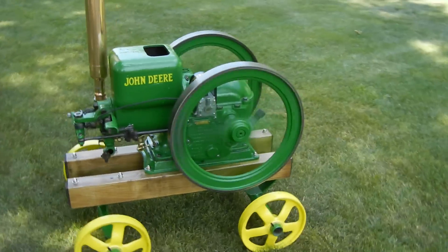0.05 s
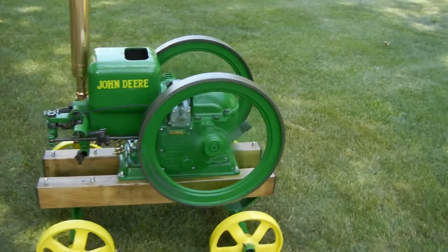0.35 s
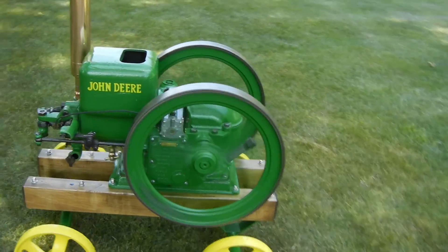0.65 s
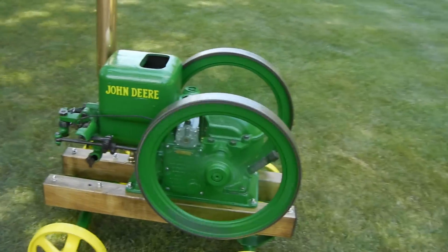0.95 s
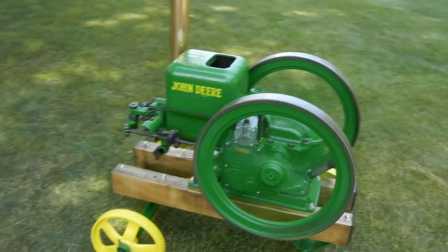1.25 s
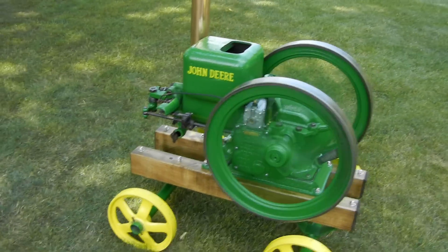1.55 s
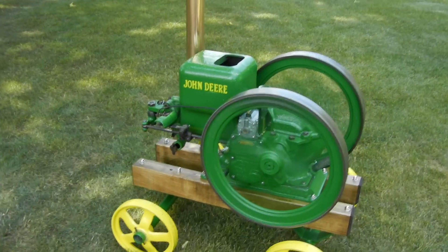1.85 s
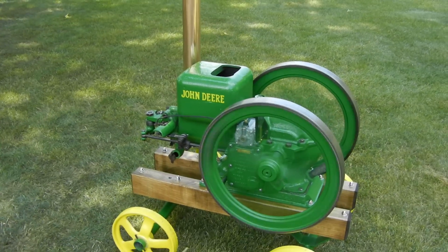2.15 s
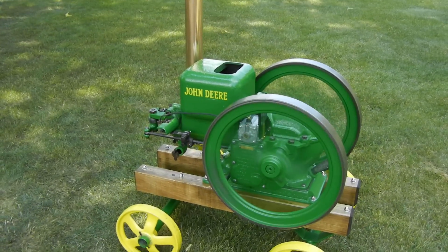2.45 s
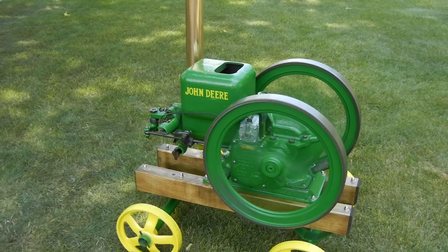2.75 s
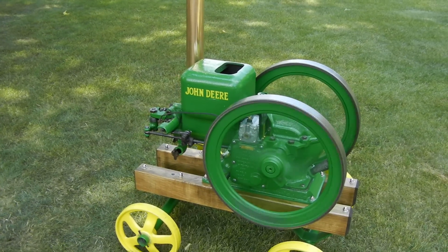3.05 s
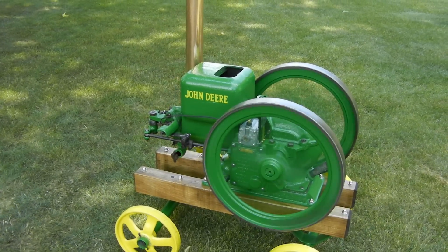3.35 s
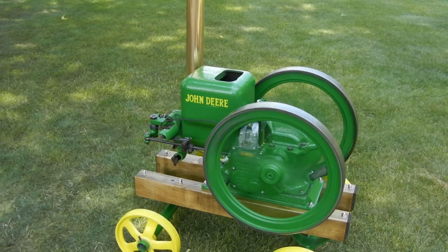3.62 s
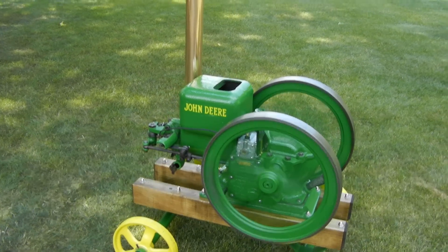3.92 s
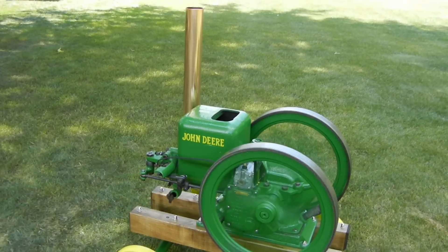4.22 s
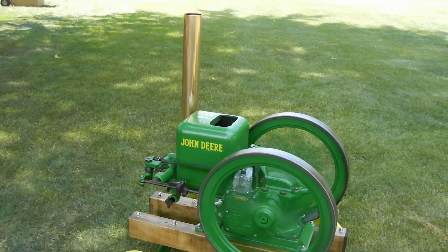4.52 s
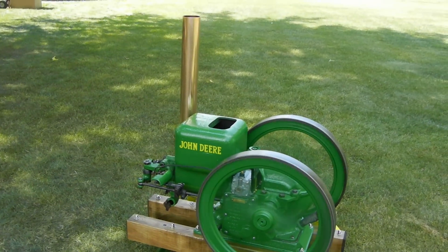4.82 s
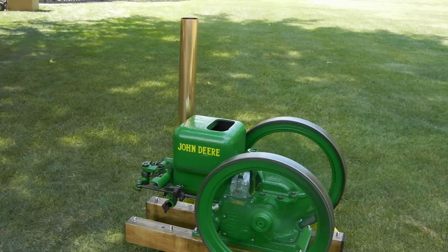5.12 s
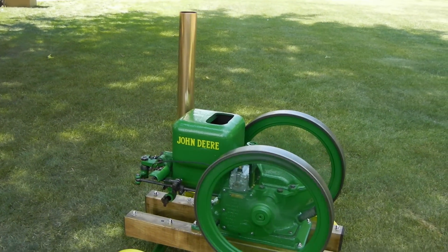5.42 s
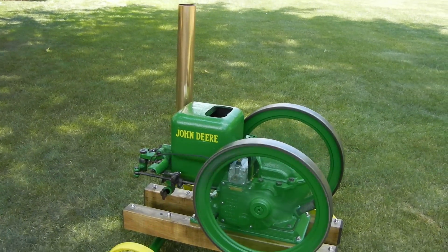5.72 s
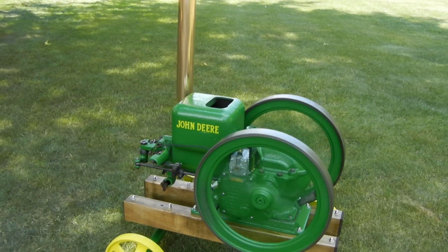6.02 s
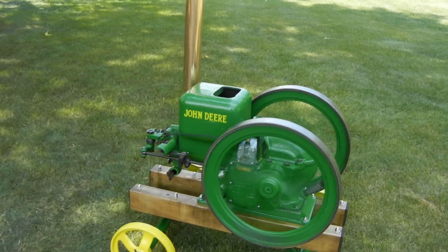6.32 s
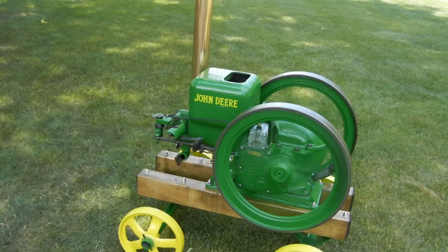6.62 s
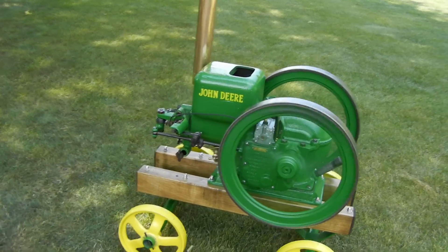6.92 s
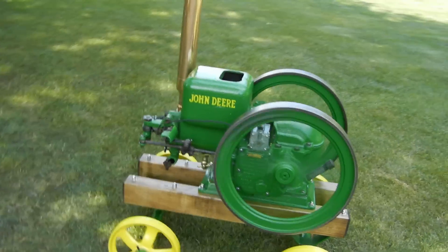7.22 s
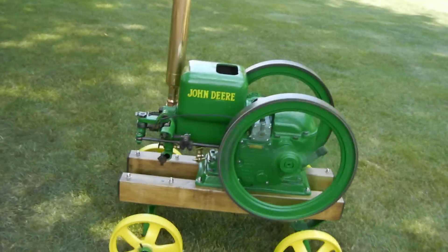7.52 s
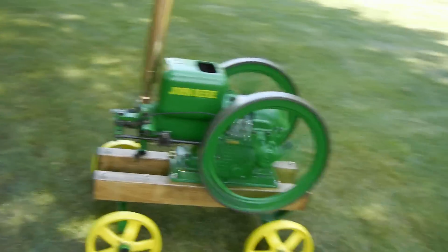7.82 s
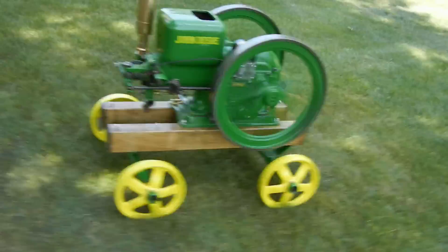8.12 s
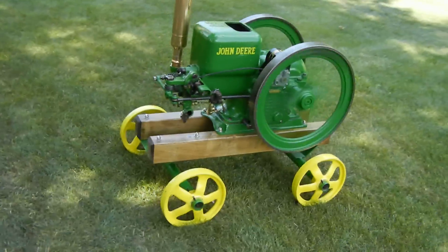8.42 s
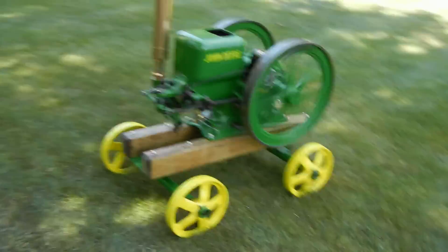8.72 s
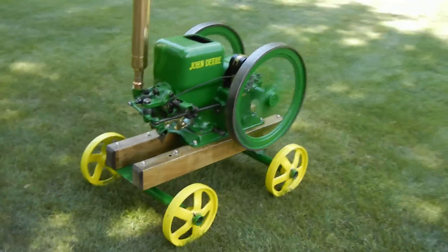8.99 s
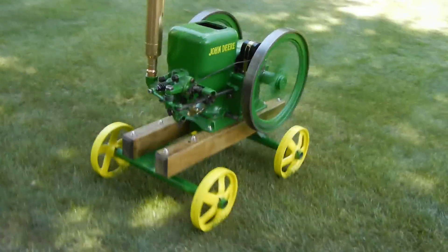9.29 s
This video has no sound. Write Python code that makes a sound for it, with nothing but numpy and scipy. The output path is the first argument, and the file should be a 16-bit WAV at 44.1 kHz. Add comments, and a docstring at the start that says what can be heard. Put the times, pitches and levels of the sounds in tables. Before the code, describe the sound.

An old single-cylinder stationary engine idles outdoors on a lawn, heard close up for about ten seconds. It fires five times, at about 0.3, 2.4, 4.5, 6.8 and 8.6 seconds. Just before each firing comes a short, raspy suck of air with a chattering, faintly honking valve, then a hard steel snap. The sharp exhaust bang follows at once, with a hollow note from the stack and a brief hissing tail. The bangs are the loudest sounds, and each makes the overall level dip for a moment.

Between firings the engine coasts on its flywheels, slowing slightly. A latch clacks with a short metallic ring about five times a second, each clack followed by a lighter clink. Underneath, from start to end, gears rattle and whirr in quick surges, the connecting rod knocks, sometimes harder, and the piston adds soft low thuds.

```python
"""Five sharp bangs, with clacking and rattling between them: a hit-and-miss engine idles close by on a lawn.
For each firing it sucks in a charge, snaps its igniter and fires up the exhaust stack. Then it coasts on
its flywheels, slowing a little, and the governor latch clacks once per coasting turn of the cam (two
revolutions, four strokes). Underneath, the connecting rod knocks, the gears rattle and the piston thuds.
Each bang ducks the camera's gain for a moment."""
import sys
import numpy as np
from scipy import signal
from scipy.fft import rfft, irfft, next_fast_len
from scipy.io import wavfile
from scipy.ndimage import uniform_filter1d, map_coordinates

SR = 44100
rng = np.random.default_rng(int(sys.argv[2]) if len(sys.argv) > 2 else 0)


def transcribe(u):
    """Save the signal u as a 16-bit wav file named by the first command-line argument.

    u: samples, shape (n,) or (channels, n), limited to [-1, 1]; the rate is SR.
    q: integer samples, one column per channel.
    """
    v = np.clip(np.atleast_2d(u).T, -1, 1)
    q = np.round(v * 32767).astype(np.int16)
    wavfile.write(sys.argv[1], SR, q)


N = 421155

# the firings: (time of the bang [s], bang trim [dB], intake trim [dB], igniter trim [dB])
FIRINGS = [(0.3214, 4.5, 6, -0.5), (2.4201, 5.5, 2, -0.5), (4.5287, 5.5, 2.5, -4), (6.8484, 4.5, 5, 1),
           (8.5521, 4.5, 0, 0)]
# tone of the moving iron, a low-mid rattle and a brighter whirr: (frequency [Hz], relative level [dB])
RATTLE_EQ = [(100, -34.5), (330, -4.5), (420, -17.5), (520, -2.5), (1050, -2), (1350, 2.5), (2000, -5),
             (3000, -15.5), (4500, -26), (8000, -33), (10000, -38), (16000, -44)]
WHIRR_EQ = [(200, -35.5), (600, -9), (1200, -6), (2100, 5), (2800, 0), (3600, -7), (4600, -27.5),
            (8000, -35.5), (10000, -34.5), (16000, -31.5)]


def exhaust():
    """The valve opens: a pressure slug rings the stack, the jet roars and hisses, the piston hoots."""
    # gas column of the stack: (frequency [Hz], relative level [dB], t60 [s])
    stack_modes = [(199, -0.5, 0.075), (266.5, -7, 0.11)]
    # tone of the jet and of its hissing tail: (frequency [Hz], relative level [dB])
    jet_eq = [(50, -24), (250, -11), (450, 4.5), (1000, 2.5), (1900, 10), (3000, 6.5), (4500, -6.5),
              (8000, -11.5), (16000, -14)]
    hiss_eq = [(200, 10), (700, -17), (2000, -4), (4000, -6), (7500, -4), (11000, -11), (16000, -9.5)]
    s, db, *_ = np.transpose(FIRINGS)
    t, slug = np.arange(SR // 3) / SR, np.zeros(N)
    column = sum(amp(level - 60 * t / t60) * np.sin(2 * np.pi * hz * t) for hz, level, t60 in stack_modes)
    hoot = amp(-5) * np.exp(-((t - .057) / .012) ** 2) * np.sin(2 * np.pi * 165 * t)
    for start, level in zip(s, db):
        add(slug, start, hoot - amp(level + 4) * column)
    # the slug keeps little deep bass below about 110 Hz
    slug = signal.sosfilt(signal.butter(2, 110, "highpass", fs=SR, output="sos"), slug)
    jet = colour(bursts(s + .0026, db + 9.5, t60=.055, rise=.0019), jet_eq, iron=.16)
    hiss = colour(bursts(s + .005, db - 14, t60=.35, rise=.0051), hiss_eq, iron=.62)
    return pan_right(slug) + jet + hiss


def intake():
    """Before a firing the piston sucks air past the spring valve, which chatters on its seat and honks."""
    # tone of the inrushing air and of the valve on its seat: (frequency [Hz], relative level [dB])
    air_eq = [(100, 4), (400, -1.5), (650, 2), (1000, -6), (2400, 1), (3500, -10), (5500, -13),
              (12000, -17.5), (16000, -17)]
    valve_eq = [(300, 0), (2000, 12), (4500, 3), (7000, -4), (10000, -3.5), (12500, 4), (16000, -14)]
    s, _, db, _ = np.transpose(FIRINGS)
    t, honk = np.arange(SR // 3) / SR, np.zeros(N)
    flutter = np.sin(2 * np.pi * 158 * np.arange(N) / SR + 1.3 * wobble(45))
    # the fluttering valve chops the air into a rasp
    air = colour(bursts(s - .156, db - 10.5, t60=.27, rise=.028) * amp(1.2 * flutter), air_eq, iron=.96)
    # (time before the bang [s], level [dB])
    bounces = [(.1335, -7.5), (.115, -11.5), (.101, -26), (.092, -18), (.068, -31)]
    chatter = sum(bursts(s - lead, db + level, t60=.046, rise=.0003, same=.28) for lead, level in bounces)
    for start, level in zip(s - .147, db):
        add(honk, start, amp(level - 24 - 60 * t / .74) * (1 - np.exp(-t / .0027)))
    return air + colour(chatter, valve_eq, iron=.9) + pan_right(honk * flutter)


def igniter():
    """The igniter trips with a hard steel snap just before the charge burns."""
    # tone of the snap: (frequency [Hz], relative level [dB])
    snap_eq = [(200, -6), (800, -3.5), (2200, 3.5), (3300, 0), (4800, -7), (6500, -3.5), (9000, -8.5),
               (12000, -13), (16000, -15)]
    s, *_, db = np.transpose(FIRINGS)
    return colour(bursts(s - .0402, db - 1, t60=.035, same=.47), snap_eq, iron=.6)


def latch():
    """On coasting turns the push rod clacks onto the governor latch, rings, rebounds and clinks off."""
    # the clack's iron body and bright steel edge: (frequency [Hz], relative level [dB])
    iron_eq = [(60, -32), (400, -10.5), (700, -3.5), (1050, -2.5), (1400, 4.5), (1900, -7.5), (2800, -0.5),
               (3300, -11), (4500, -20.5), (7000, -31), (16000, -77)]
    steel_eq = [(300, -35), (2500, 4), (4000, 12), (5500, 0.5), (7500, -3), (10000, -1.5), (13000, -5.5),
                (16000, -10)]
    # ring of the push rod: (frequency [Hz], relative level [dB], t60 [s])
    rod_modes = [(1480, -5, .07), (2855, 0, .08)]
    s, length, fired, _ = cam_turns()
    catch, release = s[~fired], (s + .17 * length)[~fired]
    scatter = rng.standard_normal((len(catch), 6)).T
    clack_db, ring_db, clink_db, bounce_db = 1.77 * scatter[:4]
    bounced = catch + .006 * (1 + .2 * scatter[4])
    seated = catch + .001495 + .001 * scatter[5]  # the rod slides home, never at quite the same instant
    iron = (bursts(seated, clack_db - 6.5, t60=.06, rise=.0011, same=.4)
            + bursts(release, clink_db / 2 - 10.5, t60=.03, rise=.00036, same=.37))
    steel = (bursts(catch, ring_db - 19, t60=.026, rise=.00044, same=.66)
             + bursts(release, clink_db - 29, t60=.045, rise=.0004, same=.3))
    rebound = bursts(bounced, bounce_db - 9.5, t60=.048, rise=.0006, same=.45)
    rod = ringing(seated, clack_db - 15, rod_modes)
    return (colour(iron, iron_eq, iron=1.23) + colour(steel, steel_eq, iron=.89)
            + colour(rebound, WHIRR_EQ, iron=1.4) + rod)


def big_end():
    """The connecting rod takes up its play: a boom each stroke, a ringing double knock past mid-turn."""
    # accented turns: (time within the turn [s], force over a usual knock [dB])
    hard_knocks = [(.885, 6), (1.088, 7.5), (2.143, 9), (2.982, 8), (3.400, 1), (3.612, 6), (3.825, 7.5),
                   (4.884, 4), (5.504, 7), (7.847, 8)]
    # ring of the crankcase: (frequency [Hz], relative level [dB], t60 [s])
    case_modes = [(543.4, -3, .12), (1244, 0.5, 0.082), (1360, 1.5, 0.072)]
    # the frame's boom on each stroke: (position [share of the turn], level [dB])
    stroke_booms = [(.17, -26), (.385, -32), (.675, -25), (.87, -30)]
    s, length, _, charging = cam_turns()
    scatter = rng.standard_normal((len(s), 7)).T
    slips_s, accents_db = .002 * scatter[:4], 2.1 * scatter[4:6]
    force_db = 2 * scatter[6] - 11 * charging  # a compressed charge cushions the knock
    for when, db in hard_knocks:
        force_db[np.searchsorted(s, when) - 1] = db
    knock_db = force_db / 2 - 19.5
    heavy = sum(bursts(s + share * length + slip, knock_db, t60=.065, rise=.0037, same=1)
                for share, slip in zip((.605, .66), slips_s))
    light = sum(bursts(s + share * length + slip, db - 18, t60=.072, rise=.0051, same=.93)
                for share, slip, db in zip((.35, .86), slips_s[2:], accents_db))
    case = ringing(s + .62 * length + slips_s[0], knock_db, case_modes)
    knocking = (0, 0, 1, 0)  # the third stroke carries the knock
    booms = sum(frame_boom(s + share * length, db + knocks * force_db)
                for (share, db), knocks in zip(stroke_booms, knocking))
    return colour(heavy, RATTLE_EQ, iron=1.6) + colour(light, WHIRR_EQ, iron=1.3) + case + booms


def frame_boom(times, levels_db, hz=249.9, t60=.074):
    """The frame swells into a hollow boom after a blow."""
    t, track = np.arange(SR // 3) / SR, np.zeros(N)
    for s, db, (detune, accent) in zip(times, levels_db, rng.standard_normal((len(times), 2))):
        swell = amp(db + 1.8 * accent - 60 * t / t60) * t / .0047
        add(track, s, swell * np.sin(2 * np.pi * hz * (1 + .073 * detune) * t))
    return pan_right(track)


def running_gear():
    """Gears and bearings rattle in surges as the piston loads them; compression takes up their play."""
    # tone of the low thump: (frequency [Hz], relative level [dB])
    thump_eq = [(20, -22), (40, -14), (70, -9), (110, -1.5), (150, -6.5), (200, -3), (235, 1), (275, -3),
                (315, -11), (350, -4), (390, -18), (800, -17), (16000, -91)]
    # surges: (mean [dB], swing per revolution [dB], swing per stroke [dB], crest [share of the turn])
    rattle_surge = (-22.5, 2, 3, .158)
    whirr_surge = (-23.5, -0.44, 4.5, .134)
    thump_surge = (-32, 2, 2, .195)
    t, marks = np.arange(N) / SR, cam_marks()
    turn = np.interp(t, marks, np.arange(len(marks)))
    compression = sum(np.exp(-((t - bang + .056) / .025) ** 2) for bang, *_ in FIRINGS)
    play_db = 1.5 * wobble(35)
    rattle_db = surge(turn, *rattle_surge) + play_db - 9.4 * compression
    rattle = amp(rattle_db) * colour(wear(turn, same=.25, grit_db=1.5), RATTLE_EQ, iron=1.74)
    whirr_db = surge(turn, *whirr_surge) + play_db + 1.9 * wobble(60) - 6.9 * compression
    whirr = amp(whirr_db) * colour(wear(turn, same=.072, grit_db=2), WHIRR_EQ, iron=.98)
    thump_db = surge(turn, *thump_surge) + 1.8 * wobble(25) - 19 * compression
    thump = amp(thump_db) * colour(wear(turn, same=.48, grit_db=3.5), thump_eq)
    return rattle + whirr + thump


def surge(turn, mean_db, revolution_db, stroke_db, crest):
    """Level in dB that rises and falls once per revolution and once per piston stroke."""
    crank = 4 * np.pi * (turn - crest)
    return mean_db + revolution_db * np.cos(crank) + stroke_db * np.cos(2 * crank)


def wear(turn, same, grit_db, size=9216):
    """Worn surfaces chatter in small jolts: part comes round again with each cam turn, part is new."""
    samples_into_turn = np.round(np.arange(N) - SR * cam_marks()[turn.astype(int)]).astype(int)
    repeating = rng.standard_normal((2, size))[:, samples_into_turn % size]
    noise = np.sqrt(same) * repeating + np.sqrt(1 - same) * rng.standard_normal((2, N))
    return unit(noise * amp(grit_db * wobble(700)))


def piston_thuds(hz=89, width_s=.0039, top_db=-26, bottom_db=-33.5):
    """At top and bottom dead centre the piston turns round and shoves the wooden skids: a soft thud."""
    s, length, *_ = cam_turns()
    lead = SR // 40
    t, track = np.arange(-lead, lead) / SR, np.zeros(N)
    thud = np.exp(-(t / width_s) ** 2) * np.sin(2 * np.pi * hz * t)
    for share, db in ((0, bottom_db), (.26, top_db), (.5, bottom_db), (.76, top_db)):
        for centre, accent_db in zip(s + share * length, 2.1 * rng.standard_normal(len(s))):
            add(track, centre - lead / SR, amp(db + accent_db) * thud)
    return pan_right(track)


def cam_marks():
    """Start of every cam turn: a firing speeds the flywheels up, then friction lengthens each turn."""
    fastest, slowest, slowing = .2016, .217, .0017  # nominal turn lengths and growth per turn [s]
    bangs = np.array(FIRINGS)[:, 0]
    starts = bangs + .0177  # the exhaust valve opens just ahead of a turn
    last_clacks = bangs - .1995  # leaves time for intake, compression and burning
    coast = lambda k: k * fastest + slowing * k * (k - 1) / 2
    marks = [[last_clacks[0] - slowest, last_clacks[0]]]
    for start, end in zip(starts, last_clacks[1:]):  # each coast is stretched to hold whole turns
        turns = round((end - start) / ((fastest + slowest) / 2))
        marks.append(start + (end - start) * coast(np.arange(turns + 1)) / coast(turns))
    marks.append(starts[-1] + coast(np.arange(7)))
    return np.concatenate(marks)


def cam_turns():
    """Start and length of each turn, whether it opens with a bang, and whether it draws in a charge."""
    marks, bangs = cam_marks(), np.array(FIRINGS)[:, 0]
    fired = np.isin(np.arange(len(marks)), np.searchsorted(marks, bangs))
    return marks[1:-1], np.diff(marks)[1:], fired[1:-1], fired[2:]


def bursts(times, levels_db, t60, rise=.0001, same=0.):
    """Decaying noise hits, mid and side; the share `same` of their power repeats from hit to hit."""
    t = np.arange(SR // 3) / SR
    envelope = amp(-60 * t / t60) * (1 - np.exp(-t / rise))
    repeating, track = rng.standard_normal((2, len(t))), np.zeros((2, N))
    for s, db in zip(times, levels_db):
        noise = np.sqrt(same) * repeating + np.sqrt(1 - same) * rng.standard_normal(repeating.shape)
        add(track, s, amp(db) * envelope * noise)
    return track


def ringing(times, levels_db, modes):
    """Modes of a struck part; every blow excites them a little differently."""
    t, track = np.arange(SR // 3) / SR, np.zeros(N)
    hz, mode_db, t60 = np.transpose(modes)[:, :, None]
    scatter = rng.standard_normal((len(times), 2, len(modes), 1))
    for s, db, (accent, detune) in zip(times, levels_db, scatter):
        decay = amp(db + mode_db + 1.6 * accent - 60 * t / t60)
        partials = decay * np.sin(2 * np.pi * (hz + 9 * detune) * t)
        add(track, s, partials.sum(axis=0) * (1 - np.exp(-t / .002)))
    return pan_right(track)


def colour(x, eq, iron=0., thicket_db=7.5, spacing_hz=60, size=8192):
    """Unit-power EQ with cast-iron resonances scaled by `iron`; mid and side in, left and right out."""
    # cast-iron resonances: (frequency [Hz], width [Hz], lift at iron=1 [dB])
    iron_modes = [(553, 40, 5), (718, 100, 4), (804, 49, 1), (933, 20, 4.5), (1250, 41, 4), (1366, 24, 2.5),
                  (2284, 110, 1), (2826.6, 55, 3.5), (6200, 110, 1.5), (7900, 270, 2)]
    # stereo width: (frequency [Hz], left-right likeness [0-1])
    likeness = [(30, .45), (70, 0.74), (140, 0.97), (3000, 0.99), (6000, 0.55)]
    # stereo balance: (frequency [Hz], left minus right [dB])
    balance = [(50, -1.5), (150, -1), (3200, -2.07), (8000, 1), (12000, 3)]
    hz = np.fft.rfftfreq(size, 1 / SR)
    peaks = sum(lift / (1 + (2 * (hz - f) / width) ** 2) for f, width, lift in iron_modes)
    # toward the treble the small parts add a thicket of narrow modes
    ripple = np.tanh(map_coordinates(rng.standard_normal(size), [hz / spacing_hz]))
    thicket = ripple * thicket_db * hz / (hz + 2500)
    magnitude = unit(amp(along(eq, hz) + iron * (peaks + thicket)))
    cepstrum = irfft(np.log(magnitude + 1e-6))
    cepstrum[1:size // 2] *= 2  # minimum phase keeps the attacks sharp
    cepstrum[size // 2 + 1:] = 0
    spread = np.arccos(np.clip(along(likeness, hz), 0, 1)) / 2
    lean = amp(along(balance, hz) / 2)
    response = np.exp(rfft(cepstrum)) * np.array([lean, 1 / lean])
    mid = signal.oaconvolve(x[:1], irfft(response * np.cos(spread))[:, :size // 2], axes=1)
    side = signal.oaconvolve(x[1:], irfft(response * np.sin(spread))[:, :size // 2], axes=1)
    return (mid + side * [[1], [-1]])[:, :N]


def pan_right(mono):
    """Sets a sound a little to the right."""
    return mono * amp([[-.7], [.7]])


def amp(db):
    return 10 ** (np.asarray(db) / 20)


def unit(x):
    return x / np.sqrt(np.mean(x ** 2) + 1e-20)


def along(points, hz):
    """Joins (frequency [Hz], value) points on a log axis."""
    f, v = np.transpose(points)
    return np.interp(np.log(hz + 1), np.log(f + 1), v)


def wobble(rate):
    """A smooth random curve, rate knots a second."""
    return map_coordinates(rng.standard_normal(int(N * rate / SR) + 4), [np.arange(N) * rate / SR])


def add(track, s, sound):
    """Lays a sound into a track at time s."""
    start = max(round(s * SR), 0)
    part = sound[..., :max(N - start, 0)]
    track[..., start:start + part.shape[-1]] += part


def scene():
    """The coasting machinery with the firings on top."""
    return running_gear() + big_end() + piston_thuds() + latch() + intake() + igniter() + exhaust()


def gain_control(x, ceiling_db, recovery_db, size=128):
    """The gain ducks within milliseconds under a loud sound and climbs back by recovery_db a second."""
    power = np.abs(uniform_filter1d(np.mean(x ** 2, axis=0), size))
    over_db = np.maximum(10 * np.log10(power + 1e-12) - ceiling_db, 0)
    climb = recovery_db * np.arange(N) / SR
    cut_db = np.maximum.accumulate(over_db + climb) - climb
    return x * uniform_filter1d(amp(-cut_db), size // 2)


def record(dry):
    """The camera rides its gain, flattens the peaks that slip through and cuts the very top."""
    held = np.clip(gain_control(dry, ceiling_db=-8.5, recovery_db=87.5), -1, 1)
    size, top_hz = next_fast_len(N + SR // 2), 15900
    passband = np.fft.rfftfreq(size, 1 / SR) < top_hz
    return irfft(rfft(held, size) * passband, size)[:, :N]


dry = scene()
out = record(dry)
transcribe(out)
```